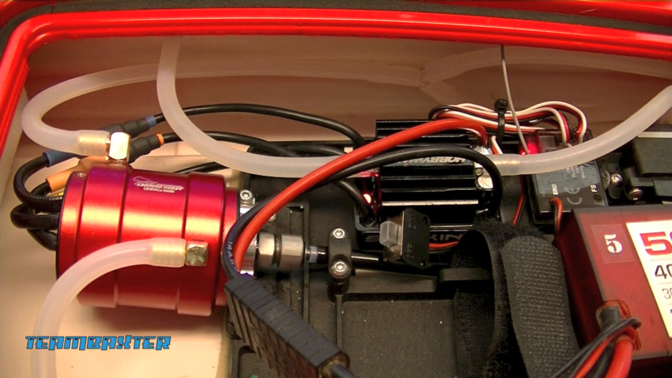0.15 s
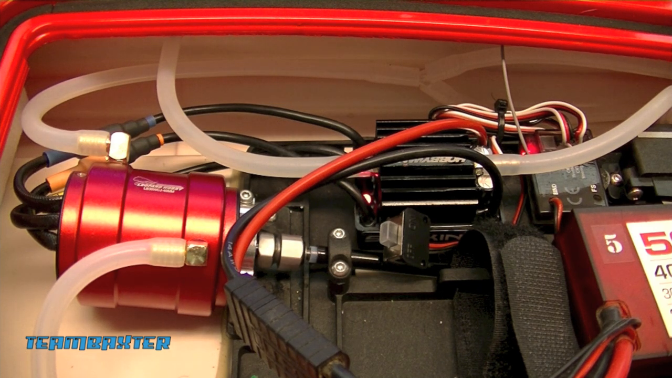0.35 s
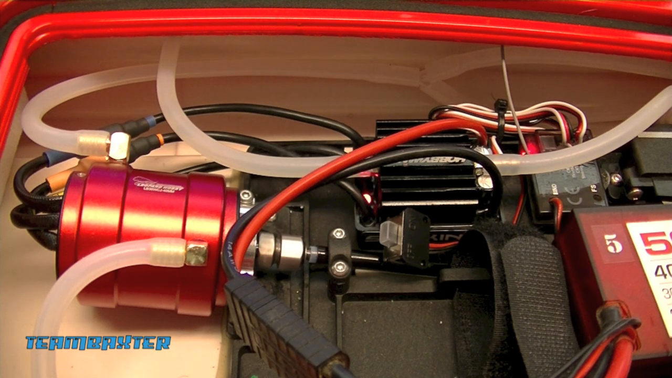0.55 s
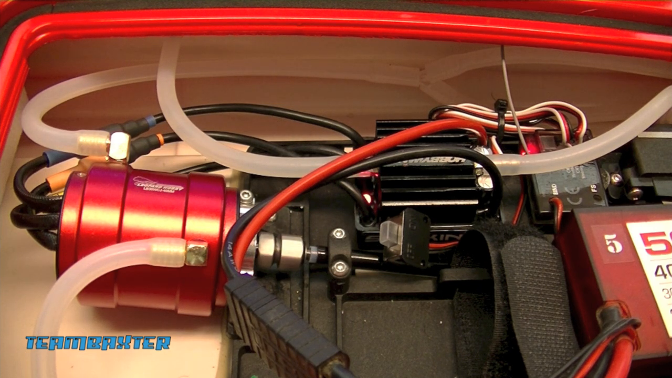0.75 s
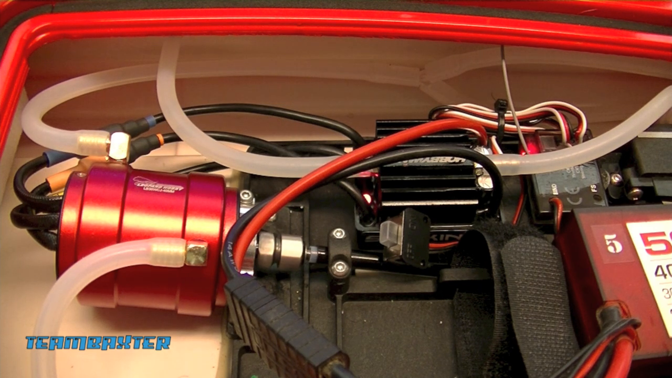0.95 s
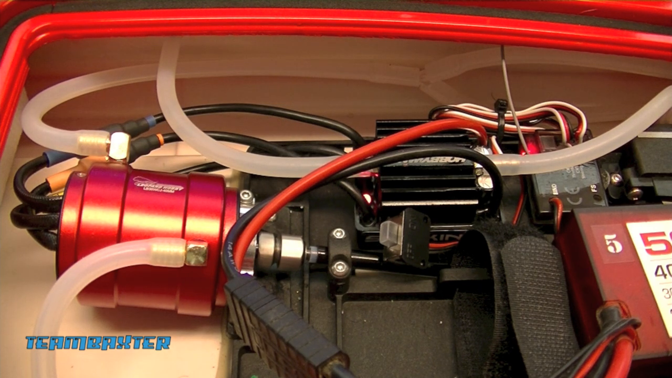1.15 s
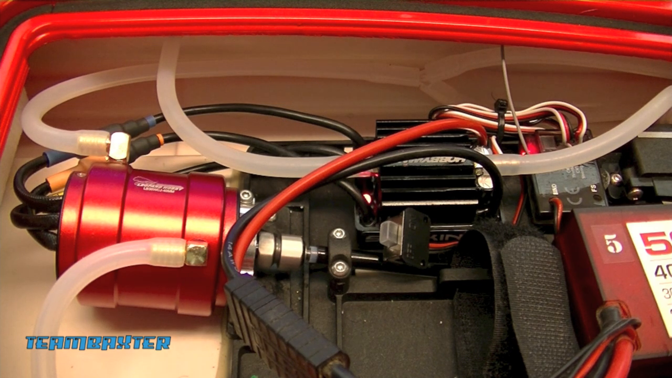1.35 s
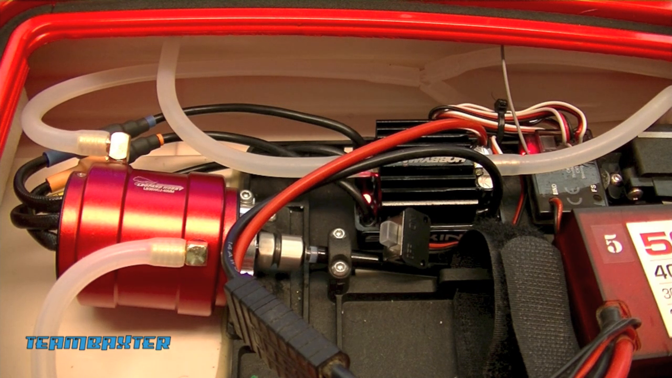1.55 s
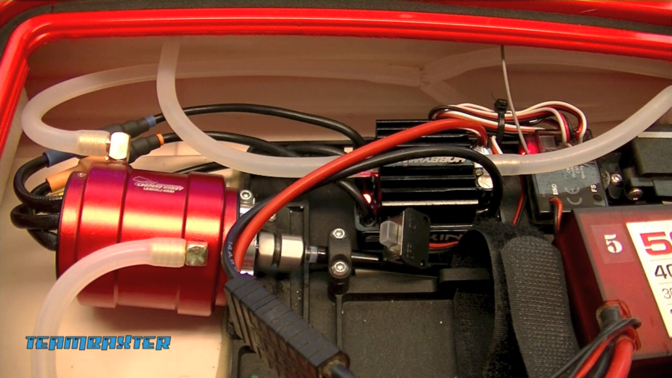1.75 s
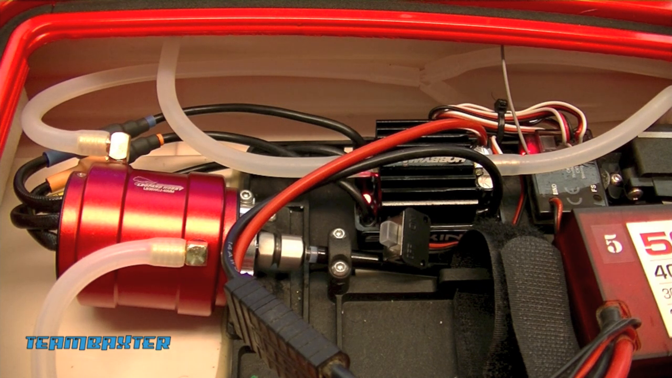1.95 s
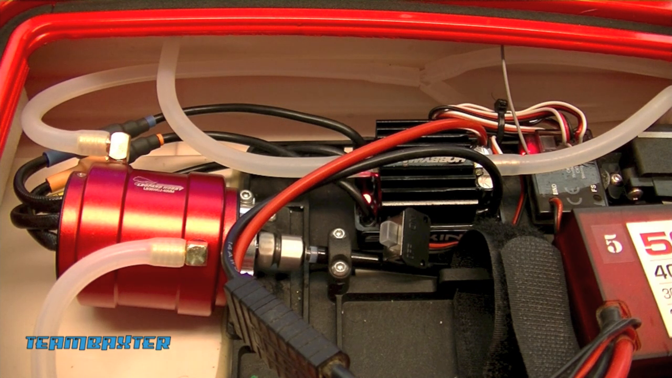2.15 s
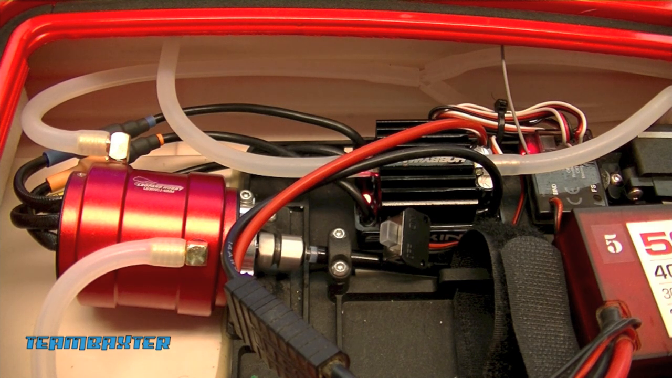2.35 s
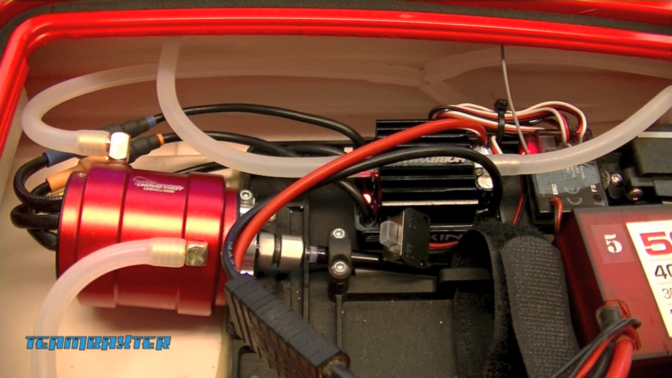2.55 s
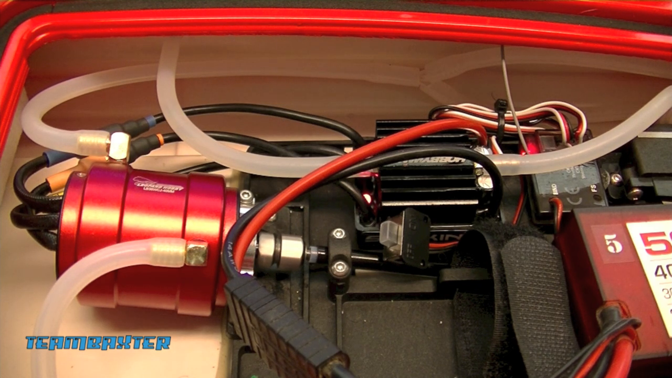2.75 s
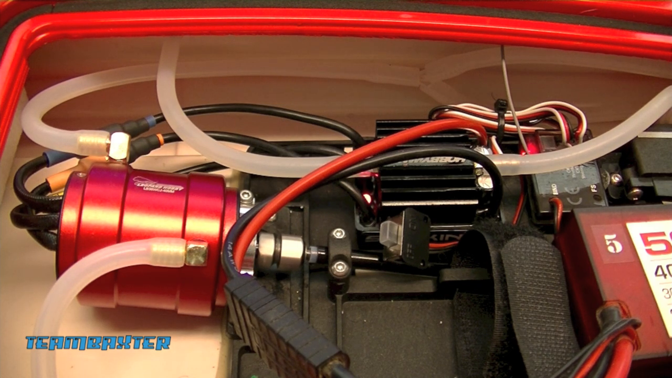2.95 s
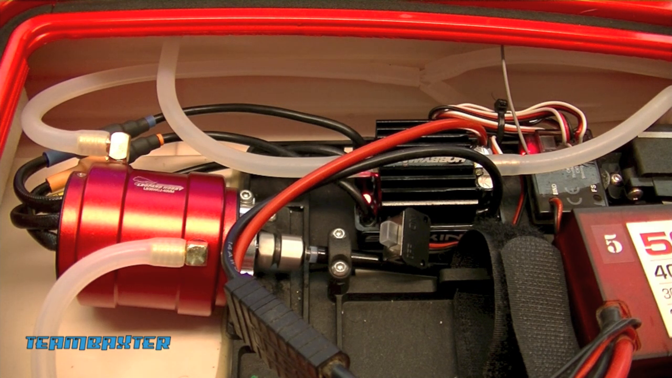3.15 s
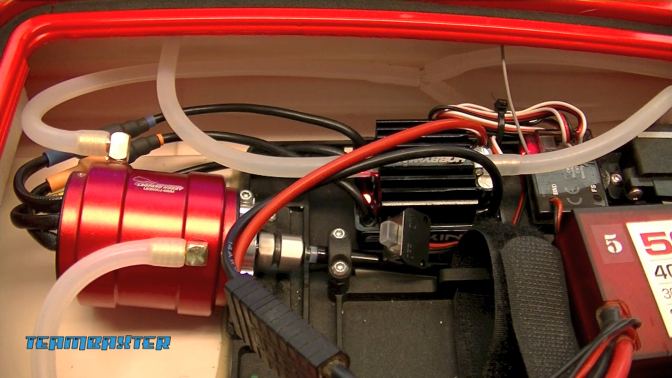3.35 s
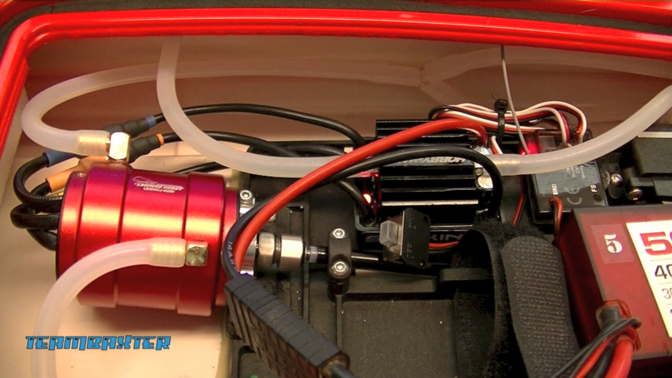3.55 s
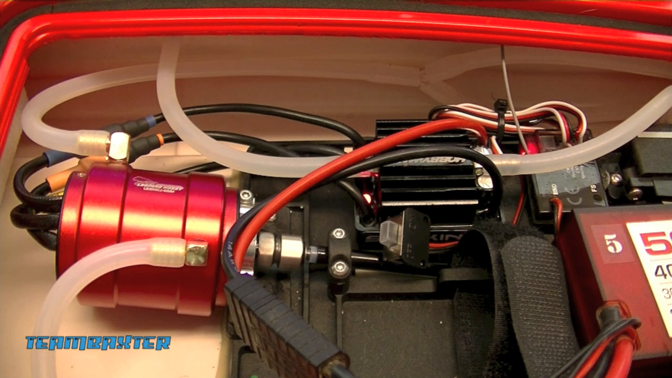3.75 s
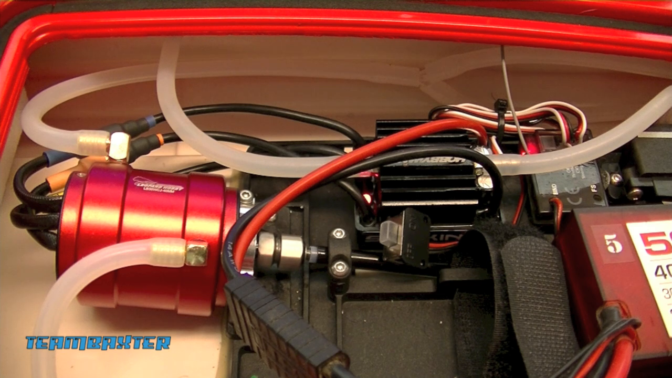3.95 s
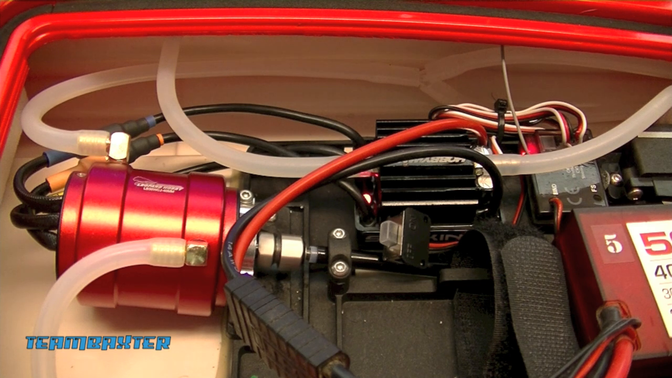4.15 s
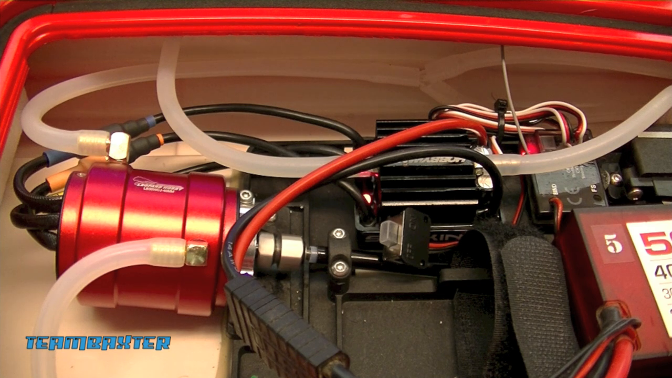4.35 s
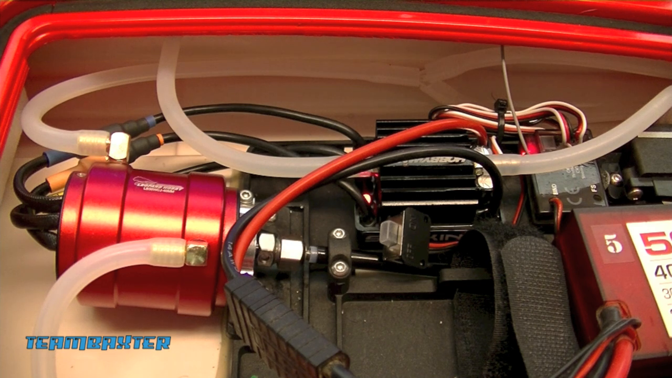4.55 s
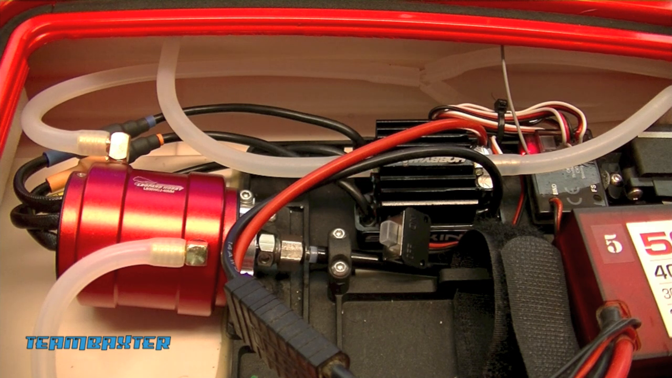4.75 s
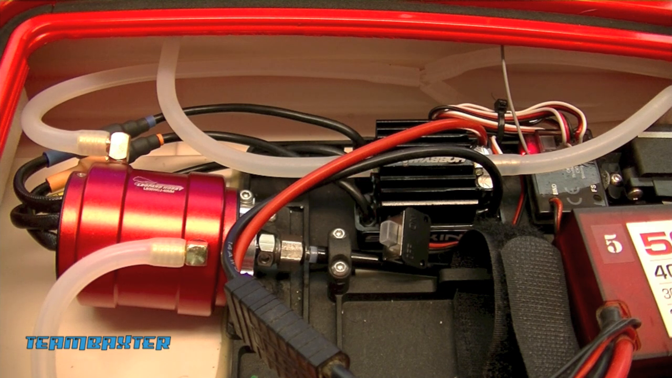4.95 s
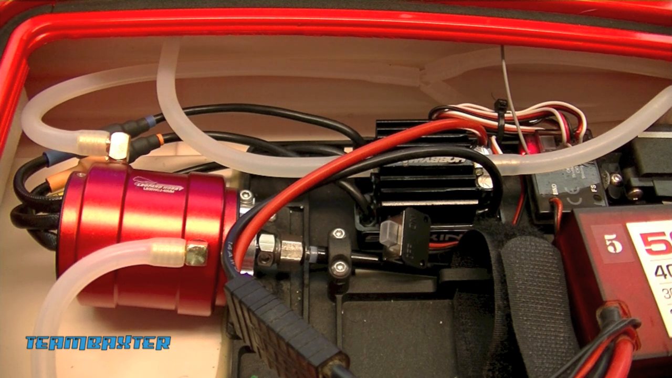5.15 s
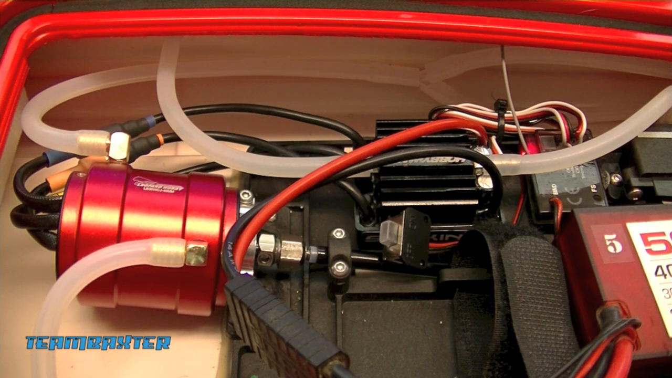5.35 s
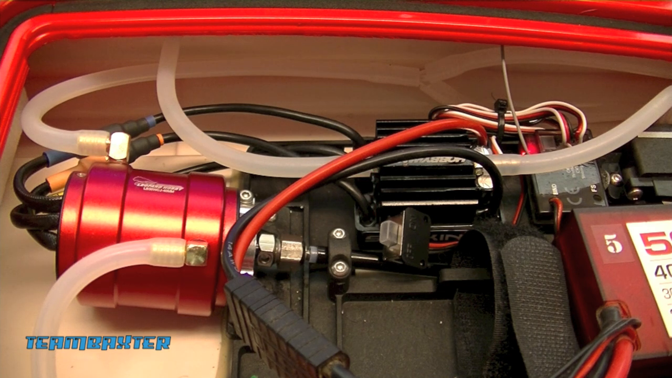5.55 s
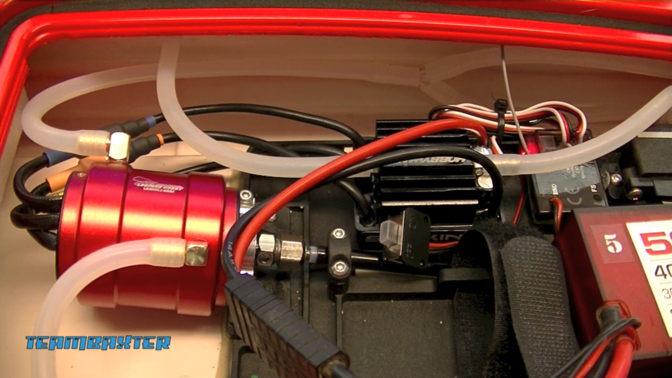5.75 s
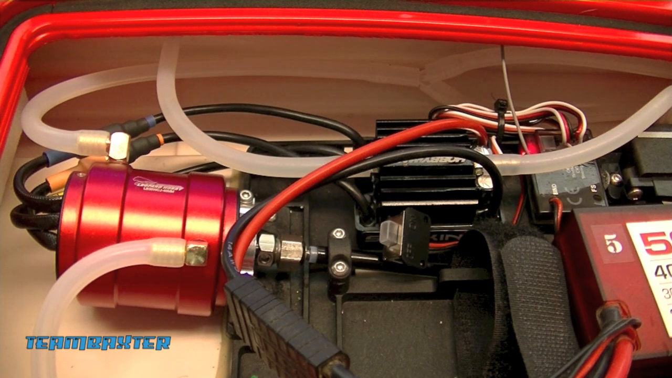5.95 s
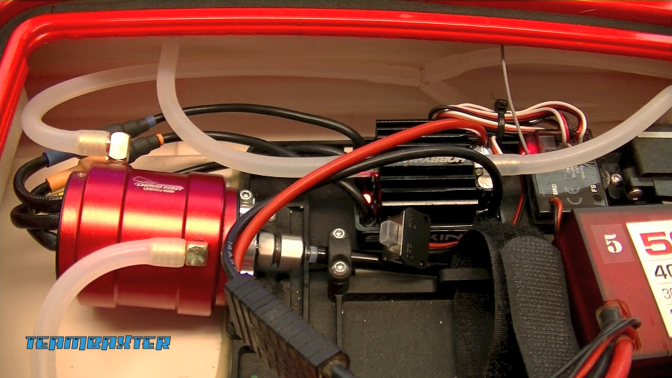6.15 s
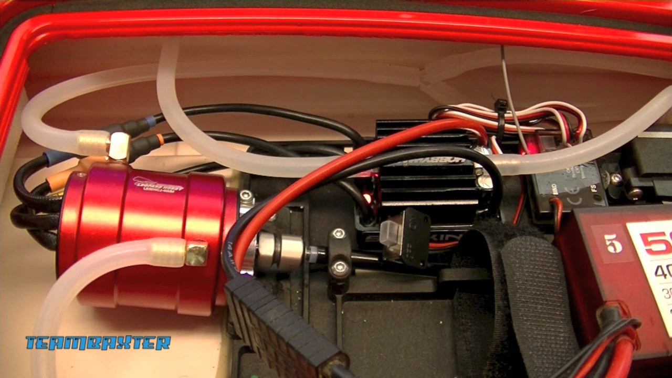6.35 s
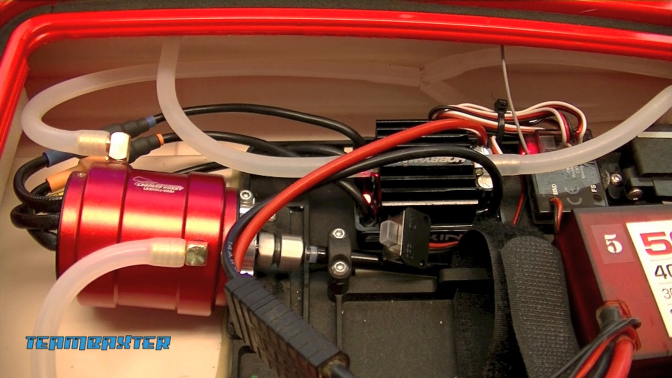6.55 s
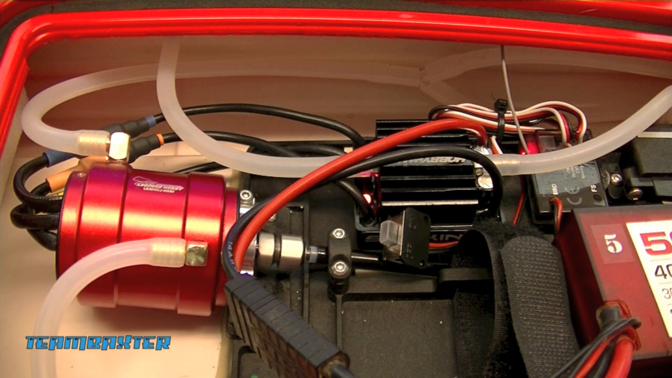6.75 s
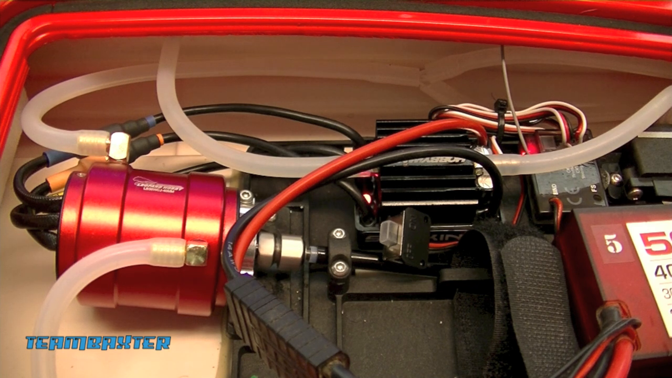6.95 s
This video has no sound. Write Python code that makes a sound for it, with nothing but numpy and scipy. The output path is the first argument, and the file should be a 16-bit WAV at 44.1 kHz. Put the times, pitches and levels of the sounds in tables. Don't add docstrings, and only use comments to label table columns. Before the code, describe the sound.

High steady electric whine over a stuttering rattle settles into a low ticking hum, cuts to quiet room tone, then restarts with a rough shudder.

```python
import sys
import numpy as np
from scipy import signal
from scipy.fft import rfft, irfft, next_fast_len
from scipy.io import wavfile
from scipy.ndimage import uniform_filter1d, map_coordinates

SR = 44100
rng = np.random.default_rng(int(sys.argv[2]) if len(sys.argv) > 2 else 0)


def materialize(psi):
    bounded = np.clip(np.atleast_2d(psi).T, -1, 1)
    quanta = np.round(bounded * 32767).astype(np.int16)
    wavfile.write(sys.argv[1], SR, quanta)


def undo_db(level):
    steps = np.asarray(level, float) / 20
    return 10 ** steps


N = 312757
T = np.arange(N) / SR

# time_s, speed_turns_per_s
SPEED = [(0, 16), (.7, 17.1), (1.6, 17.6), (1.9, 18.5), (2.3, 18.8), (2.5, 19.5), (2.65, 20.0),
         (3.1, 20.21), (3.6, 20.43), (4.1, 20.67), (4.6, 20.83), (6.14, 19.6), (6.815, 19.7), (6.845, 20.6),
         (7.09, 21)]
WHOLE_TURN = [1.5623, 1.9425, 2.2116, 2.3707, 2.4757, 2.6295, 3.0765, 3.5694, 4.0568, 4.5866, 6.3675,
              6.6725, 6.9178, 7.062]
# time_s, lock_0_to_1, coupler_knock_db
LOCK = [(0, 0.06, -50), (1.5, 0.3, -38), (1.55, 0.06, -22.5), (2.42, 0.48, -46.5), (2.62, 0.95, -17.5),
        (2.85, 1, -33), (3.1, 0.95, -21.5), (3.6, 0.95, -17.5), (4.1, 1, -14), (4.6, 0.83, -13),
        (4.62, 0.9, -74), (6.1, 0.65, -80.5), (6.81, 0.26, -58), (6.835, 0.96, -17), (6.93, 0.99, -20),
        (6.96, 0.92, -15.5), (7.09, 0.8, -13)]
# start_s, length_s, whine_db
CUT_OUTS = [(0.006, 0.025, -20), (0.049, 0.008, -12), (0.071, 0.009, -12), (0.118, 0.02, -13),
            (0.144, 0.028, -11), (0.212, 0.024, -19), (0.247, 0.01, -16), (0.293, 0.006, -8),
            (0.348, 0.019, -17), (0.375, 0.027, -15), (0.415, 0.01, -15), (0.471, 0.021, -13),
            (0.501, 0.006, -12), (0.534, 0.03, -16), (0.567, 0.018, -19), (0.594, 0.01, -12),
            (1.139, 0.004, -10), (1.147, 0.015, -15), (1.177, 0.006, -13), (1.303, 0.017, -10),
            (1.324, 0.012, -14), (1.352, 0.003, -10), (1.447, 0.025, -14), (1.479, 0.009, -15),
            (1.535, 0.013, -8), (1.706, 0.002, -8), (6.186, 0.003, -8)]
# start_s, length_s, rattle_db
SURGES = [(.008, .022, -13), (0.042, 0.0098, -23), (0.07, 0.0061, -12), (0.073, 0.067, 0.5),
          (0.131, 0.0093, -8), (0.147, 0.024, -15.5), (0.22, 0.02, -9.5), (0.242, 0.0067, -10),
          (0.296, 0.0089, -9), (0.38, 0.021, -17), (0.412, 0.011, -7.5), (0.42, 0.025, 1.5),
          (0.488, 0.005, -18), (0.5, .006, -3), (0.543, 0.019, -13), (0.574, 0.013, -13.5),
          (0.594, 0.011, -12.5), (.694, 0.024, -4.5), (1.019, 0.015, -8.5), (1.124, 0.067, 3.5),
          (1.156, 0.036, -10), (1.238, .045, -1.5), (1.315, 0.039, 1), (1.338, 0.014, -18.5),
          (1.346, 0.014, 4.5), (1.453, 0.03, 5.5), (1.471, 0.012, -15.5), (1.534, 0.017, 4.5),
          (1.547, 0.012, -2.5), (1.551, 0.014, 0.5), (2.11, 0.046, 2), (2.47, 0.041, 3), (6.224, .016, 7),
          (6.256, 0.018, 4.5), (6.291, 0.014, 4.5), (6.311, 0.016, -5.5), (6.344, 0.011, 2),
          (6.442, .022, 0), (6.537, 0.018, 0.5), (6.927, 0.25, 4.5)]

# time_s, level_db
WHINE = [(0, -30.5), (.6, -28.5), (1.1, -28.5), (2.85, -26.5), (3.6, -27.5), (4.58, -26), (4.625, -37.5),
         (4.65, -53), (4.66, -63), (4.74, -63), (6.138, -75), (6.15, -36), (6.21, -25), (6.4, -27.5),
         (7.09, -27)]
# shaft_multiple, level_db
SIDEBAND = [(-10, -31), (-8, -34.5), (-4, -57), (-2, -50), (-1, -47.5), (1, -29), (8, -31), (11, -30.5),
            (12, -42)]
# pitch_hz, density_db_per_hz
FIZZ = [(7000, -47), (8500, -12), (10000, -14), (12000, -10), (14000, 4), (15800, 1.5)]
# pitch_hz, density_db_per_hz
SPUTTER = [(6000, -23), (7500, 18.5), (8500, 19), (9500, 2.5), (12000, -10.5), (15000, -18)]
# start_s, length_s, level_db_re_whine
SPITS = [
    (.115, .045, -28.5),
    (.19, .035, -33.5),
    (.265, .045, -33.5),
    (.335, .04, -31),
    (.42, .075, -33),
    (.535, .05, -34.5),
    (1.105, .052, -31.5),
    (1.18, 0.072, -24.5),
    (1.3, 0.11, -31),
    (1.43, 0.031, -33),
]
# pitch_hz, density_db_per_hz
SPIT_SPECTRUM = [(8000, -31.5), (8800, 2.5), (11000, -5.5), (13000, -5), (15800, -15.5)]

# time_s, effort_db
SHAKE = [(0, -32), (.08, -30.5), (.6, -32.5), (.72, -23.5), (.82, -31.5), (1.4, -28.5), (1.62, -35),
         (2.52, -32), (2.6, -34.5), (4.58, -33), (4.62, -52), (4.68, -74), (6.139, -69), (6.146, -42),
         (6.178, -47), (6.19, -31), (6.8, -31.5), (7.09, -33)]
# time_s, lower_db, upper_db
LURCH = [(0.033, 0, -18), (0.156, 0.5, -14.5), (.235, -1.5, 0), (0.399, -5, -5.5), (.44, 5, -3),
         (.49, -4.5, -6), (.53, 4, -1.5), (.65, -6, -1), (.7, -1.5, -4.5), (.76, -15, -4), (.79, 2.5, 1),
         (.82, -6.5, -1), (1.229, 6.5, -5), (1.28, -1, -2), (1.36, 7.5, 3), (1.401, -0.5, -20),
         (2.43, -2, -7.5), (2.5, -0.5, -2), (4.612, 20, 9.5), (6.246, 6.5, -2), (6.306, 1.5, -0.5),
         (6.39, 6, -1), (6.53, -1.5, 2)]
# pitch_hz, width_hz, level_db
LOWER = [(184, 28, -12.5), (321.2, 7.9, 4), (364, 14.8, 5.5), (386.3, 32, 3)]
# pitch_hz, width_hz, level_db
UPPER = [(435, 30, -3), (472, 20, 1), (560, 36, -4), (670, 50, -15)]
# pitch_hz, width_hz, level_db
CATCH = [(513, 56, 0.5), (542, 27, 6), (647, 46, -9.5)]
# pitch_hz, width_hz, level_db
MOUNT = [(815, 45, 7), (1062, 68, 6), (1200, 70, 1), (1430, 104, 1), (1597, 53, 1.5), (1772, 100, -4),
         (2002, 96, -6.5), (2235, 130, -8), (2547, 54, -5.5), (2760, 77, -10.5), (3555, 450, -17),
         (5420, 740, -23.5)]
# pitch_hz, density_db_per_hz
RATTLE = [(47, -53), (80, -31.5), (184, -3), (222, -3), (408, 0), (484, -23), (921, -13), (1570, -20.5),
          (5780, -30.5), (6860, -27.5), (7400, -84), (9620, -108), (16300, -120)]
# pitch_hz, density_db_per_hz
RUMBLE = [(45, -37), (70, -23), (105, -5), (140, -1), (190, -35)]

# pitch_hz, density_db_per_hz
ROOM = [(15, -79.5), (25, -49), (43, -21.5), (90, -17.5), (140, -9), (165, -5.5), (254, -8), (299, -16.5),
        (324, -13.5), (402, -6), (436, -10), (603, -17.5), (1010, -21), (1870, -22.5), (7210, -32),
        (15800, -45.5)]
# pitch_hz, likeness_0_to_1
ALIKE = [(60, 0.96), (240, 1), (950, 0.77), (3770, 0.86), (15000, 0.99)]
# pitch_hz, level_db
FAN = [(172.3, -62.5), (290.7, -61), (409.1, -53.5), (468.3, -72), (527.6, -69.5), (995.9, -69.5),
       (1055, -74.5), (1696, -72.5), (1992, -83.5), (3149, -77), (4506, -76), (4678, -76)]

# time_s, peak_db, thud_db
JOLTS = [(0.0563, -21.5, 24), (0.248, -22, 1), (0.335, -16, 2), (0.426, -34, 7), (0.563, -29, -3),
         (0.615, -21, 23.5), (0.6395, -23, -7), (0.652, -10, 8), (0.6666, 2.5, -15), (0.71, -2, 0),
         (0.7397, -15, -9), (0.808, -17, -4), (0.826, -17, -11), (0.835, -18, -7), (1.0384, -15, -10),
         (1.1, -13.5, -11), (1.235, -17, -12), (1.272, -26, -14), (0.774, -9.5, -15), (0.928, -15, -8),
         (0.982, -14, -2), (1.055, -10.5, -7), (1.0853, -20, -2), (1.1787, -27, 25), (1.218, -14, -10),
         (1.352, -25, 23), (1.408, -16, 3)]
# time_s, peak_db, thud_db
MORE_JOLTS = [
    (0.726, -9, -8),
    (0.785, -6, -8),
    (0.866, -12, -2),
    (0.8995, -13, 8),
]
# time_s, peak_db, thud_db
JOLTS_AGAIN = [(6.1526, -28, 9), (6.186, -35, 6), (6.2316, -12, 8), (6.262, -10, 2), (6.298, -19, 0),
               (6.37, -28, 13), (6.4223, -26, 26), (6.4372, -15, 15), (6.54, -15, -8), (6.571, -19, -30),
               (6.6725, -17, 6.5), (6.721, -16.5, 4), (6.748, -18, 3), (6.824, -13.5, -18)]
# time_s, peak_db, thud_db
TICKS = [
    (4.949, -27.5, -8),
    (5.251, -46, 6),
]
# time_s, peak_db
TAPS = [(0.7504, -17), (0.8424, -27), (0.8504, -18), (0.8754, -19), (0.8844, -16), (0.914, -22),
        (0.9444, -23), (0.9676, -20), (1.4351, -25), (1.529, -23), (1.6445, -26), (1.702, -22),
        (1.7565, -30), (1.8123, -28), (1.8564, -27), (1.9994, -19), (2.0476, -23), (2.0976, -28),
        (2.155, -26), (2.2438, -28), (2.2648, -19), (2.2972, -20), (2.3186, -28), (2.402, -24),
        (2.4249, -23), (6.4687, -29), (6.5232, -26), (6.5894, -21), (6.6453, -22), (6.6897, -20),
        (6.79, -22.5), (6.843, -16), (6.9348, -15.5)]
# pitch_hz, width_hz, level_db
COUPLER = [(1075, 40, -6.5), (1590, 78, 3.5), (1936, 110, 4.5), (2140, 300, -0.5), (2750, 395, -2.5),
           (3025, 230, 0.5), (3640, 110, -5.5), (4380, 250, -11), (4960, 140, -17), (5950, 1100, -18.5)]
# pitch_hz, width_hz, level_db
THUMP = [(328, 130, -7), (510, 200, -8)]
# pitch_hz, width_hz, level_db
BENCH = [(624, 100, -1), (750, 92, 3)]
# pitch_hz, width_hz, level_db
KNOCK_BODY = [(555, 45, -5), (1048, 62, -3.5)]
# pitch_hz, width_hz, level_db
PUNCH = [(411, 240, 0)]

# time_s, level_db
COG = [(0, -57), (.1, -31), (.57, -55), (.63, -24), (.76, -32), (1.56, -25), (1.76, -33.5), (2.4, -38),
       (2.47, -27), (3.0, -22.5), (4.1, -17), (4.6, -21.5), (4.72, -39), (6.14, -76), (6.42, -52),
       (6.52, -26.5), (6.78, -37), (6.84, -24)]
# time_s, level_db
OCTAVE_SWELL = [(2.4, -1.5), (3.0, 0), (3.7, -1.5), (4.6, 2), (6.34, -13), (6.37, 2), (6.46, -5), (6.49, -4),
                (6.58, -13), (6.61, -2), (6.7, -2.5), (6.81, 0), (6.84, -16), (7.09, -15)]
# time_s, pitch_hz, level_db
SHUDDER = [
    (6.18, 393.4, -24.5),
    (6.215, 345, -26.5),
    (6.258, 331, -16),
    (6.322, 329, -10.5),
    (6.37, 353, -49),
]
# shaft_multiple, level_db
ORDER_TREND = [(6, -34), (10, -17.5), (15, -19), (22, -14.5), (26, -14), (36, -14.5), (43, -20), (50, -26),
               (56, -24), (63, -21.5)]
ORDER_STRONG = [(16, 11.5), (17, 6), (18, 11), (21, -12), (23, 3.5), (26, -1), (27, 2), (28, -6.5),
                (31, 1.5), (32, 0), (34, 0.5), (36, 0), (45, -7.5), (48, 11), (49, 7), (50, 8), (51, 5),
                (58, 2), (53, -6), (60, 0)]
# pitch_hz, width_hz, level_db
ORDER_MODE = [(555, 50, 1.2)]
# pitch_hz, density_db_per_hz
CRACK = [(1200, -35), (2000, 6), (4000, -10), (7000, -9), (9500, -9.5), (10500, -49.5)]

# pitch_hz, t60_s
TAIL = [(200, 0.42), (2000, 0.098), (7000, 0.34), (9000, 0.091)]
# pitch_hz, level_db
WIDE = [(200, -42.5), (500, -30.5), (1000, -12.5), (2000, -15.5), (4000, -7.5), (8000, -8), (14000, 0.5)]
# pitch_hz, level_db_re_whine
MASK = [(6700, -90), (6950, -56.5), (7650, -48), (7800, -70), (8300, -71), (8450, -35.5), (10000, -48),
        (12500, -61), (14000, -54.5), (15000, -60), (15500, -73)]

SWITCH_HZ = 8034.1
CRACK_S = .6662
BEAT_FROM_S, BEAT_TO_S = 6.59, 6.81
BEAT_LAG_S = 0.00279
REBOUND_S = .017


def unit(x):
    return x / np.sqrt(np.mean(x ** 2) + 1e-20)


def along(points, hz):
    f, v = np.transpose(points)
    return np.interp(np.log(hz + 1), np.log(f + 1), v)


def curves(rows):
    s, *cols = np.transpose(rows)
    return [np.interp(T, s, c) for c in cols]


def gated(rows):
    return sum(value * ((T > s) & (T < s + length)) for s, length, value in rows)


def wobble(rate, depth_db=None):
    curve = map_coordinates(rng.standard_normal(2000), [np.clip(T[::16] * rate, 0, 1990)])
    return np.interp(T, T[::16], curve if depth_db is None else undo_db(depth_db * curve))


def filtered(x, response):
    m = next_fast_len(N + SR // 2)
    return irfft(rfft(x, m) * response(np.fft.rfftfreq(m, 1 / SR)), m)[..., :N]


def ringing(x, modes):
    def response(f):
        return sum((-1) ** k * undo_db(db) * 1j * f * w / (c * c - f * f + 1j * f * w)
                   for k, (c, w, db) in enumerate(modes))
    return filtered(x, response)


def hiss(spectrum):
    return unit(filtered(rng.standard_normal(N), lambda hz: undo_db(along(spectrum, hz))))


def steady(x, size=6000):
    return x / np.sqrt(np.abs(uniform_filter1d(x * x, size)) + 1e-12)


def shaft():
    turns = np.cumsum(curves(SPEED)[0]) / SR
    slip = np.unwrap(np.interp(WHOLE_TURN, T, turns) % 1, period=1)
    return turns - np.interp(T, WHOLE_TURN, slip)


def drive(share, soft_s):
    return undo_db(uniform_filter1d(share * gated(CUT_OUTS), round(soft_s * SR)))


def surge(share):
    return undo_db(uniform_filter1d(share * gated(SURGES), size=130))


def whine(turns):
    level_db, = curves(WHINE)
    lock = curves(LOCK)[0]
    on = (T < 4.7) | (T > 6.138)
    power = drive(share=1.15, soft_s=.005)

    sway = sum(undo_db(db) * wobble(1.0, depth_db=2.5) * np.exp(2j * np.pi * (k * turns + rng.random()))
               for k, db in SIDEBAND)
    flutter = filtered(rng.standard_normal((2, N)), lambda hz: 1 / (1 + (hz / 230) ** 8))
    in_phase = undo_db(-12.5 - 9.3 * lock) * unit(flutter[0])
    quadrature = undo_db(-14.0 - 4.7 * lock) * unit(flutter[1])
    modulation = power + (sway + in_phase + 1j * quadrature) * power ** 0.5
    lead = .045j * np.array([[1], [-1]]) * (1 + .4 * wobble(24))
    tone = np.sqrt(2) * np.real(modulation * np.exp(2j * np.pi * SWITCH_HZ * T + lead))

    fizz_gain = undo_db(-26.5) * undo_db(2.4 * wobble(24) - 7.0 * lock) * power ** .4 * surge(share=.8)
    mid, side = np.array([hiss(FIZZ), hiss(FIZZ)]) * [[1], [.3]] * fizz_gain
    hunting = uniform_filter1d(gated([(s, length, undo_db(db)) for s, length, db in SPITS]), size=100)
    mid = mid + hunting * wobble(140, depth_db=4.5) * surge(share=.7) * hiss(SPIT_SPECTRUM)

    struggle = np.abs(uniform_filter1d(1 - power, 5000))
    sputter = undo_db(-13.5) * np.sqrt(struggle) * power ** 0.33 * surge(share=0.43) * hiss(SPUTTER)
    tone = tone + sputter + mid + [[1], [-1]] * side
    return on * undo_db(level_db + 0.043 * wobble(32)) * tone


def shake():
    effort_db, = curves(SHAKE)
    loose = 1 - curves(LOCK)[0]
    lurch_s = 0.026
    lurch_db = sum(np.outer(db, np.exp(-((T[::16] - s) / lurch_s) ** 2)) for s, *db in LURCH)
    low_db, high_db = (np.interp(T, T[::16], db) for db in lurch_db)
    seesaw_db = 1 * loose * wobble(21)
    return (effort_db + low_db + 0.2 + 7 * loose + seesaw_db,
            effort_db + high_db + 4.5 - seesaw_db,
            effort_db + 0.23 * (low_db + high_db))


def hull_kicks(wander, on, low_db, high_db):
    kick_gain = undo_db(4.07 * np.cos(4 * np.pi * wander) + 1.7 * wobble(110))
    steps = np.diff(np.floor(6 * wander), prepend=0) * kick_gain
    noise = np.where(T < 5, .4, .17) * rng.standard_normal((2, N)) * undo_db(3.5 * wobble(90))
    kicks = unit(steps * on) + noise
    low_db = low_db - 9 * ((T > 6.23) & (T < 6.34)) - 4 * ((T > BEAT_FROM_S) & (T < BEAT_TO_S))
    high_db = high_db - 4.5 * ((T > 6.34) & (T < 6.82))
    catching = (T > 6) & (T < 6.34)
    upper = np.where(catching, ringing(kicks[1], CATCH), ringing(kicks[1], UPPER))
    hull = undo_db(low_db) * steady(ringing(kicks[0], LOWER), size=1400)
    hull = hull + undo_db(high_db) * steady(upper, size=1400)
    throb = np.interp(T, [1.4, 1.6, 2.35, 2.5, 6.55, 6.6], [0.1, 1.2, 2.0, .3, 0.28, 2.1])
    lag_turns = 0.17
    return hull * undo_db(1.5 * throb * np.cos(4 * np.pi * (wander - lag_turns)))


def mount_rattle(turns, wander, lock, loose):
    flicker_db = 3.7 * wobble(250) + 1.6 * wobble(45) + 0.22 * np.cos(4 * np.pi * wander)
    grit, fine = rng.standard_normal((2, N)) * undo_db((1 - 0.27 * lock) * flicker_db)
    taps = (rng.random(N) < 500 / SR) * rng.standard_normal(N)
    grit = grit + taps * 8.6 * loose * undo_db(4.7 * np.cos(4 * np.pi * wander))
    fine = fine * undo_db(1 * loose * np.cos(12 * np.pi * wander))
    scrape = unit(filtered(fine, lambda hz: undo_db(along(RATTLE, hz))))
    rattle = 0.75 * unit(ringing(grit, MOUNT)) + 0.57 * scrape
    rattle = rattle * undo_db(-7 * lock * (turns % 1 - .5))
    return rattle - 0.83 * lock * filtered(rattle, lambda hz: 1 / (1 + (hz / 1250) ** 6))


def chatter(turns, low_db, high_db, rattle_db):
    lock = curves(LOCK)[0]
    loose = np.sqrt(np.clip(1 - lock, .02, 1))
    on = (T < 4.76) | (T > 6.12)
    wander = turns + 0.04096 * wobble(20) * np.interp(T, [1.5, 2.2, 6], [1.6, .7, .2])
    hull = loose * hull_kicks(wander, on, low_db, high_db)
    hull = hull * drive(share=0.069, soft_s=0.0024) * surge(share=0.35)
    rattle = undo_db(rattle_db + 1.5) * mount_rattle(turns, wander, lock, loose)
    rattle = rattle * np.roll(drive(share=0.076, soft_s=0.0009), 200) * surge(share=0.91)
    return on * (hull + rattle)


def bench(rattle_db):
    return undo_db(rattle_db - 27 + 2 * (1 - curves(LOCK)[0])) * hiss(RUMBLE)


def room_tone():
    def response(hz):
        turn = np.arccos(np.clip(along(ALIKE, hz), -1, 1)) / 2
        return undo_db(along(ROOM, hz)) * [np.cos(turn), np.sin(turn)]

    mid, side = filtered(rng.standard_normal((2, N)), response)
    room = undo_db(-50.5 + 0.28 * wobble(1.0)) * unit(np.array([mid + side, mid - side]))
    fan = sum(undo_db(db + 5.5) * wobble(17.0, depth_db=1.0) * np.sin(2 * np.pi * hz * T + 0.26 * wobble(4.6))
              for hz, db in FAN)
    blades = unit(ringing(rng.standard_normal(N), [(4550, 81, 0.074), (1690, 60, 0.93)]))
    own = undo_db(-74) * (rng.standard_normal(N) + 0.59 * rng.standard_normal((2, N)))
    return room + fan + undo_db(-68.5) * blades + own


def blow_rows(at, lock, knock_db):
    slack_db = 4 * rng.standard_normal(len(at)) * (lock[at] < .5)
    rows = [(T[i], knock_db[i] + db, -10 if lock[i] < .5 else -90) for i, db in zip(at, slack_db)]
    rows += list(JOLTS) + list(MORE_JOLTS) + list(JOLTS_AGAIN) + list(TICKS)
    rows += [(T[i] + REBOUND_S, knock_db[i] + (-14 if T[i] < 5 else -5), -90)
             for i in at[:-1] if lock[i] > .8]
    return rows + [(s, db + 1.5, -11.5) for s, db in TAPS]


def knocks(turns):
    lock, knock_db = curves(LOCK)
    at = np.flatnonzero(np.diff(np.floor(turns)) > 0)
    blows, thuds, t = np.zeros((3, N + SR)), np.zeros(N + SR), np.arange(1500) / SR
    burst = 0.09 * undo_db(-60 * t / 0.025) + 0.046 * undo_db(-60 * t / 0.12)
    burst = burst + 0.062 * undo_db(-60 * np.abs(t - .0065) / 0.028) * (t > .0062)
    for s, db, thud_db in blow_rows(at, lock, knock_db):
        if thud_db <= -90:
            kind, scrape, edge = 0, 1, 3.05
        elif abs(s - CRACK_S) < .004:
            kind, scrape, edge = 2, 1, 3.08
        else:
            kind, scrape, edge = 1, 0.95, 3.08
        strike = scrape * burst * rng.standard_normal(len(t)) + edge * (t == 0)
        blows[kind, round(s * SR):][:len(t)] += undo_db(db + rng.normal(0, .6) + 9.5) * strike
        thuds[round(s * SR)] += undo_db(db + thud_db + 25.0)
    locked = filtered(blows[0, :N], lambda hz: 1 / (1 - 1j * 1420 / (hz + 1)) ** 2 / (1 + 1j * hz / 6800))
    soft = filtered(blows[1, :N], lambda hz: 1 / (1 + 1j * hz / 3500) ** 2)
    coupler = ringing(undo_db(5.0) * locked + undo_db(3.5) * soft + blows[2, :N], COUPLER)

    still = (T > 4.8) & (T < 6)
    hull = ringing(thuds[:N] * ~still, LOWER + UPPER + THUMP)
    hull = hull + undo_db(8) * ringing(thuds[:N] * still, BENCH)

    lag = round(BEAT_LAG_S * SR)
    body_db = knock_db[at] + 23 + 7.5 * (T[at] > 5)
    once = np.bincount(at, undo_db(body_db) * (lock[at] > .8), N)
    once = np.roll(once + 0.55 * np.roll(once, round(REBOUND_S * SR)), lag)
    halves = np.diff(np.floor(2 * turns), prepend=0) > 0
    second_spin = undo_db(22.5) * (T > BEAT_FROM_S) * (T < BEAT_TO_S)
    first_spin = undo_db(16.5) * (T > 1.6) * (T < 2.4)
    beats = np.roll(halves * (second_spin + first_spin), lag)
    return coupler + hull + ringing(once, KNOCK_BODY) - ringing(ringing(beats, PUNCH), PUNCH)


def order_line(turns, k, db, rate, depth_db, lag_turns, spread_turns):
    phase_turns = k * (turns - lag_turns) + rng.normal(0, k * spread_turns)
    return undo_db(db) * wobble(rate, depth_db) * np.sin(2 * np.pi * phase_turns)


def shaft_orders(turns):
    k = np.arange(64)
    order_db = np.interp(k, *np.transpose(ORDER_TREND)) + sum(db * (k == n) for n, db in ORDER_STRONG)
    low = unit(sum(order_line(turns, k, db, 1.7, 1.5, lag_turns=.56, spread_turns=.058)
                   for k, db in enumerate(order_db) if 5 < k < 20 and k != 12))
    high = unit(sum(order_line(turns, k, db, 5, 2.5, lag_turns=.2, spread_turns=.22)
                    for k, db in enumerate(order_db) if k > 19 and k != 24))
    return low, 1.03 * high + ringing(high, ORDER_MODE)


def hum(turns, low_db, high_db):
    cog_db, = curves(COG)
    lock = curves(LOCK)[0]
    on = (T < 4.76) | (T > 6.15)
    up_to_speed = uniform_filter1d(1. * ((T > 2.38) & (T < 6) | (T > 6.34)), size=900)
    detune = (24 * curves(SPEED)[0] - 471.1) / 9.5
    octave_db = high_db + 1 + 4 * (1 - lock) - 10 * np.log10(1 + detune ** 2) + curves(OCTAVE_SWELL)[0]
    unsteady = 12 * turns + 0.28 * (1 - lock) * wobble(25) * (T < 2.6)
    cog = undo_db(cog_db - 5.5) * np.sin(2 * np.pi * unsteady)
    octave = undo_db(octave_db + 1.0) * up_to_speed * np.sin(4 * np.pi * unsteady + 1)
    shudder_hz, shudder_db = curves(SHUDDER)
    shudder = undo_db(shudder_db - 3.5) * np.sin(2 * np.pi * np.cumsum(shudder_hz) / SR)
    shudder = shudder * ((T > 6.18) & (T < 6.37))
    low, high = shaft_orders(turns)
    orders = undo_db(low_db - 5.5) * low + undo_db(high_db - 7.5) * high
    return on * (cog + octave + shudder + lock * orders)


def crack():
    t = np.clip(T - CRACK_S, 0, None)
    t60_s, rise_s = 0.11, .002
    return (T > CRACK_S) * undo_db(-22.5 - 60 * t / t60_s) * (1 - np.exp(-t / rise_s)) * hiss(CRACK)


def walls(x):
    hz, t, z = signal.stft(rng.standard_normal((2, SR // 2)), SR, nperseg=256)
    z = z * undo_db(-60 * t / along(TAIL, hz)[:, None])
    z = np.array([z[0], z[1] * undo_db(along(WIDE, hz))[:, None]])
    mid, side = signal.istft(z, SR, nperseg=256)[1]
    tail = np.array([mid + side, mid - side]) / np.linalg.norm(mid)
    return signal.fftconvolve(x[None], tail, axes=1)[:, :N]


def masked(x):
    hz, t, z = signal.stft(x, SR, nperseg=2048)
    power = np.abs(z.mean(0)) ** 2
    loud = power[np.abs(hz - SWITCH_HZ) < 40].max(0)
    width = 16
    bands = power[:len(hz) // width * width].reshape(-1, width, len(t)).mean(1)
    limit = loud * undo_db(along(MASK, hz[width // 2::width][:len(bands)]))[:, None] ** 2
    keep = bands > limit * undo_db(5.5 * uniform_filter1d(rng.standard_normal(bands.shape), size=2))
    z[:, :-1] *= np.repeat(keep, width, axis=0)
    return signal.istft(z, SR, nperseg=2048)[1][:, :N]


def scene():
    turns = shaft()
    sing = whine(turns)
    low_db, high_db, rattle_db = shake()
    body = chatter(turns, low_db, high_db, rattle_db) + knocks(turns) + hum(turns, low_db, high_db)
    body = filtered(body, lambda hz: 1 / (1 + (hz / 7000) ** 16) / (1 + (110 / (hz + 1)) ** 4))
    echo = walls(undo_db(-14.0) * body + undo_db(-27.0) * sing[0])
    return sing + body + bench(rattle_db) + room_tone() + crack() + echo


def roll_off(x):
    return signal.sosfilt(signal.butter(12, 15910, fs=SR, output="sos"), x)


def record(dry):
    mix = masked(dry)
    return roll_off(mix)


dry = scene()
out = record(dry)
materialize(out)
```